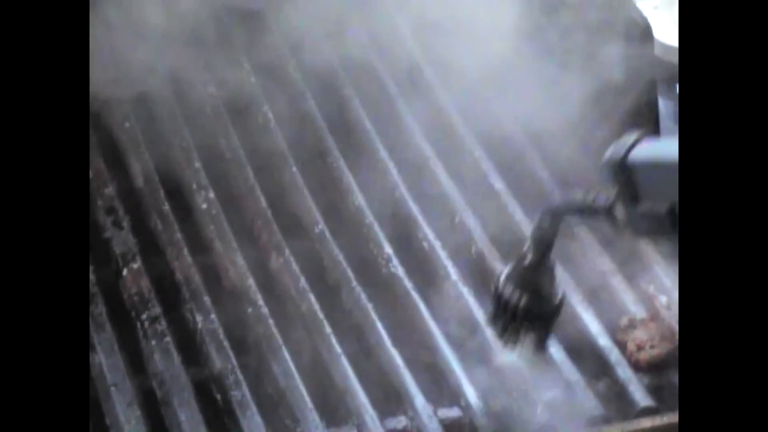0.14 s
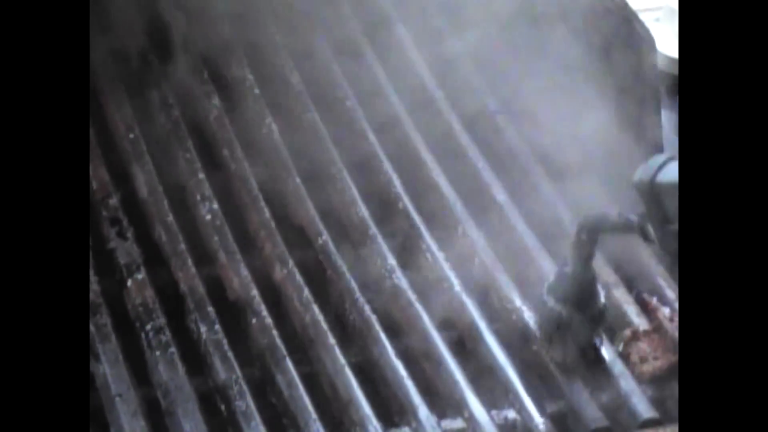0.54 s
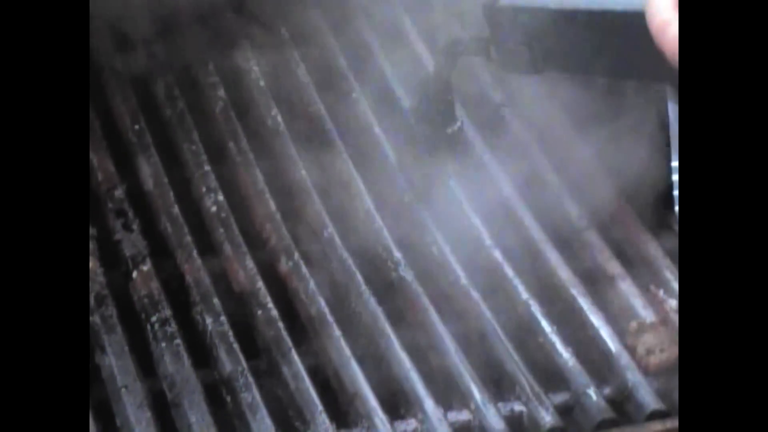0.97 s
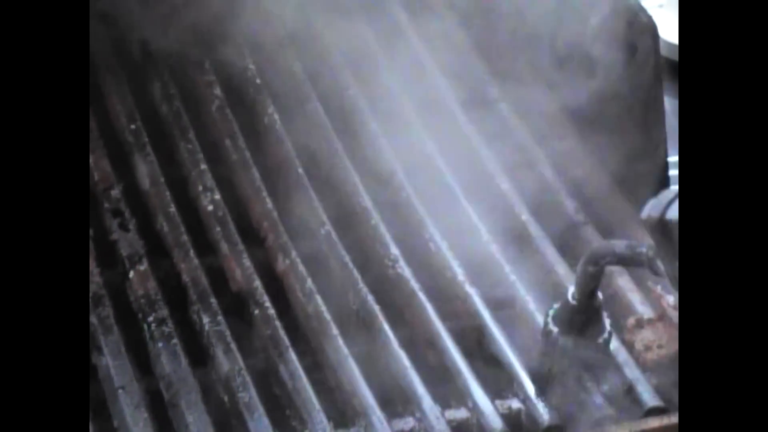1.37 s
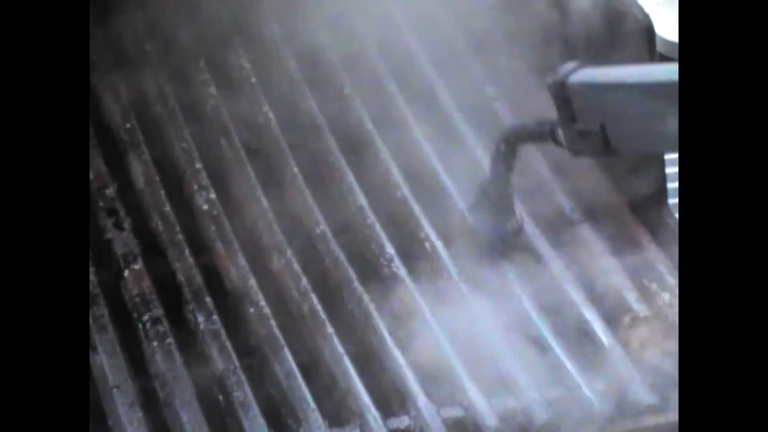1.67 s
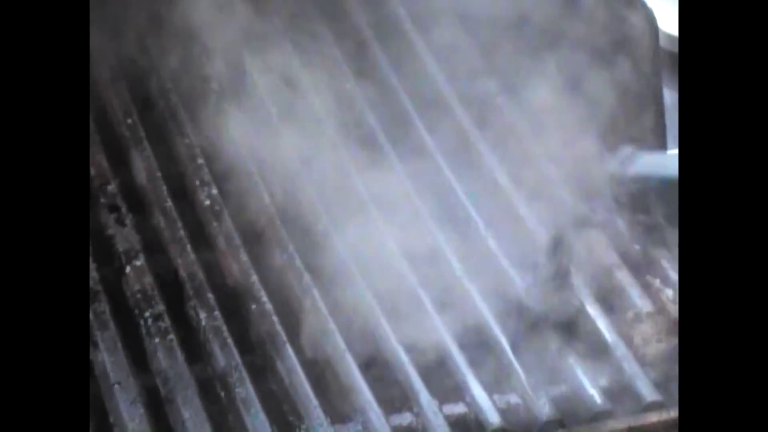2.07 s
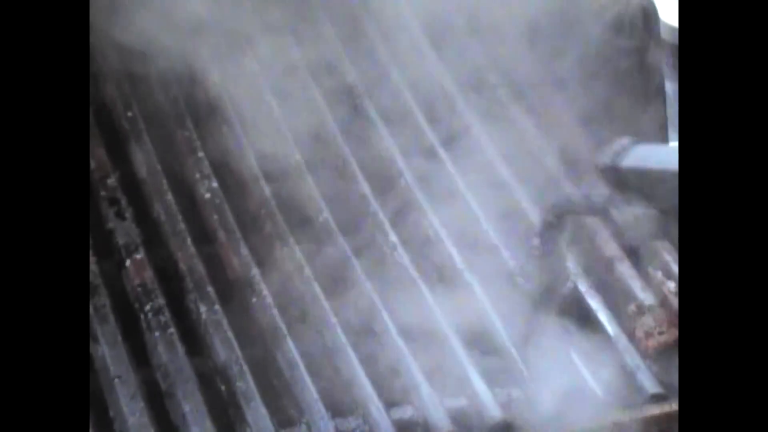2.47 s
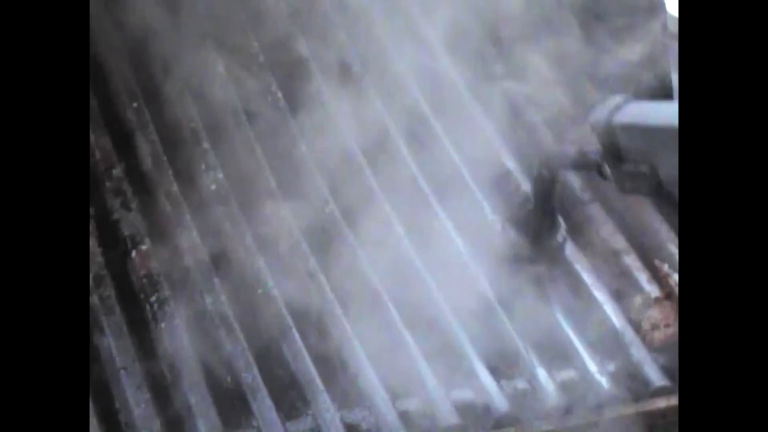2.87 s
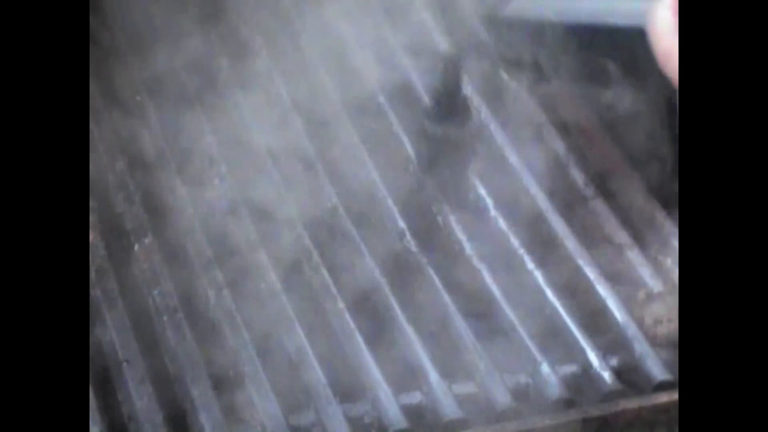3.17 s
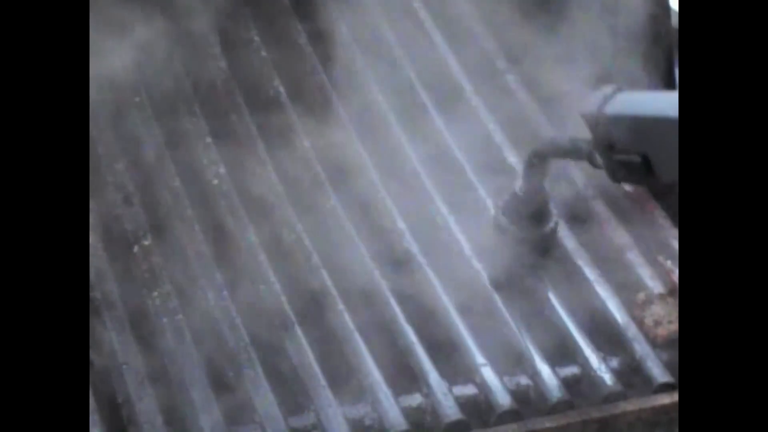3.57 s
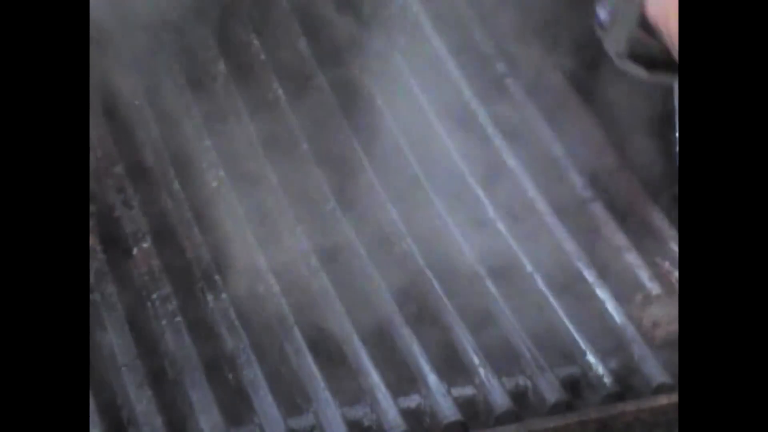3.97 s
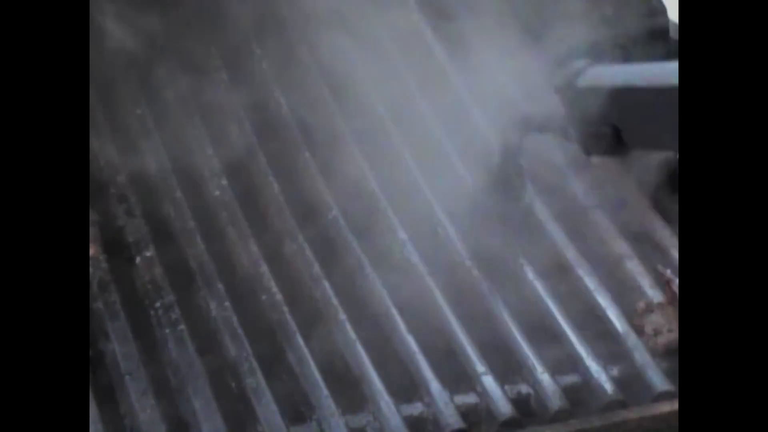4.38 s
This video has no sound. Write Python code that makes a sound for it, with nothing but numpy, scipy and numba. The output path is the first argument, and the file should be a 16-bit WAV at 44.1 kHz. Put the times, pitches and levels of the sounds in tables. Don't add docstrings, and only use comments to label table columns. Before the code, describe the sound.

A hand-held steam nozzle sweeps over metal grill bars about half a metre from a small camera microphone. The strong, bright hiss never stops; it shifts colour with each pass, fizzing briefly as it crosses bars. Wetter splashes and tiny spits sit inside it, while dull puffs drum in the metal box below. Faint outdoor rumble lies underneath, with no speech.

```python
import sys
import numpy as np
from scipy import signal
from scipy.io import wavfile
from scipy.ndimage import uniform_filter1d, map_coordinates
from numba import njit

SR = 44100
rng = np.random.default_rng(int(sys.argv[2]) if len(sys.argv) > 2 else 0)


def output_pcm(signal):
    pcm = np.clip(np.atleast_2d(signal).T, -1, 1) * 32767
    wavfile.write(sys.argv[1], SR, np.round(pcm).astype(np.int16))


def amplitude_ratio(level_db):
    exponent = np.asarray(level_db, float) / 20
    return 10 ** exponent


N = 199590

# (time [s], jet level [dB], turn towards the ports [dB], sizzle centre [Hz])
NOZZLE_AIM = [(0.0, -47.5, -1.5, 8200), (0.22, -49.5, 0, 7800), (0.32, -48, -0.5, 7660),
              (0.57, -46, 0.5, 9200), (0.72, -47, 2, 9500), (0.9, -49, -3, 7800), (1.2, -47, 0, 7600),
              (1.3, -47, -0.5, 9500), (1.5, -48, -0.5, 7400), (1.85, -47, -1, 8460), (2.13, -47, 0, 7400),
              (2.5, -46.5, -0.5, 7700), (2.85, -47.5, -0.5, 9200), (3.2, -47, -0.5, 7840),
              (3.6, -47.5, 1, 8060), (4.14, -49.5, -2, 7450), (4.3, -49.5, -2.5, 7100),
              (4.53, -48, 1, 9400)]
# (frequency [Hz], level [dB per Hz])
STEAM_COLOUR = [(71, -48), (120, -20.5), (245, -8), (340, -20.5), (417, -11.5), (522, -6), (835, -5.5),
                (944, -7), (2360, 0), (2730, -2.5), (6300, 2), (11200, -2.5), (15800, -16.5)]
FAR_HZ = 2450
LEFT_RIGHT = np.array([[1.], [-1.]])


def level(x, db):
    return x * amplitude_ratio(db) / np.sqrt(np.mean(x ** 2))


def at_hz(table, hz):
    f, value = np.transpose(table)
    return np.interp(np.log(hz), np.log(f), value)


def curves(table):
    s, *columns = np.transpose(table)
    return [np.interp(np.arange(N) / SR, s, column) for column in columns]


def walk(rate):
    hold = max(int(SR / rate), 2)
    steps = np.repeat(rng.standard_normal(N // hold + 1), hold)
    return 1.364 * uniform_filter1d(uniform_filter1d(steps, hold), hold)[:N]


def bumps(s, length, tail=1):
    late = np.arange(N) / SR - s
    return np.exp(-(2.3 * late / np.where(late > 0, tail * length, length)) ** 2)


@njit
def svf(x, g, q):
    y, b, l = np.empty(len(x)), 0., 0.
    for i in range(len(x)):
        v = (b + g[i] * (x[i] - l)) / (1 + g[i] * (g[i] + 1 / q))
        b, l, y[i] = 2 * v - b, l + 2 * g[i] * v, v / q
    return y


def eddies(hz, q, drops):
    # (frequency [Hz], side minus mid [dB])
    spread = [(30, -2), (70, -8), (150, -21), (500, -19), (800, -17), (1200, -29), (2000, -19.5),
              (3000, -16.5), (4400, -16.5), (8000, -12.5), (10500, -10), (12500, -10), (15500, -13)]
    # (frequency [Hz], left minus right [dB])
    balance = [(60, 1.0), (110, 1.0), (200, 1.0), (380, 0.5), (700, 0.0), (1290, 0.0), (2380, 0.0),
               (4400, -2.5), (8120, -2.5), (15000, 0.0)]
    g = np.tan(np.pi * np.minimum(hz, .45 * SR) / SR) * np.ones(N)
    noises = drops * rng.standard_normal((2, N))
    mid, side = (level(svf(svf(noise, g, q), g, q), 0) for noise in noises)
    mean_hz = np.mean(hz)
    stereo = mid + amplitude_ratio(at_hz(spread, mean_hz)) * side * LEFT_RIGHT
    return stereo * amplitude_ratio(at_hz(balance, mean_hz) / 2 * LEFT_RIGHT)


def turbulence(lo_hz, hi_hz, colour, gust_db, patchy_db, patchy_rate, grit_db, count):
    out, drops = 0, amplitude_ratio(grit_db * walk(500))
    for hz in np.geomspace(lo_hz, hi_hz, count):
        band_db = at_hz(colour, hz) + 10 * np.log10(hz)
        out = out + amplitude_ratio(band_db + patchy_db * walk(patchy_rate)) * eddies(hz, 2.53, drops)
    return level(out * amplitude_ratio(gust_db * walk(31.96)), 0)


def jet():
    jet_db, turn_db, hump_hz = curves(NOZZLE_AIM)
    core = turbulence(3780, 7150, STEAM_COLOUR, gust_db=0.9, patchy_db=.9, patchy_rate=12, grit_db=1.1, count=6)
    sizzle = turbulence(7820, 10070, STEAM_COLOUR, gust_db=0.6, patchy_db=1.1, patchy_rate=11, grit_db=2., count=3)
    hump = eddies(uniform_filter1d(hump_hz, SR // 12), 2.6, amplitude_ratio(0.92 * walk(430)))
    bright = level(sizzle + amplitude_ratio(-4.5) * hump, 0)
    return (core * amplitude_ratio(-turn_db) + bright * amplitude_ratio(turn_db)) * amplitude_ratio(jet_db + chokes())


def chokes():
    # (time [s], length [s], step [dB])
    steps = [(0.05, .05, 1.5), (0.132, 0.022, 3), (0.195, 0.037, -1.5), (0.297, 0.044, 2),
             (0.514, 0.014, -0.5), (0.67, 0.021, -1.5), (0.78, 0.048, 0), (1.07, 0.017, 2.5),
             (1.164, 0.02, -2), (1.567, 0.025, -2), (1.862, 0.021, 0), (2.12, .03, 1), (2.59, 0.064, -3),
             (2.857, 0.032, 2), (2.927, 0.059, -3.5), (3.17, 0.046, -1.5), (3.66, 0.043, -3),
             (3.68, 0.025, 3), (3.852, 0.043, 2), (3.868, .014, 2), (3.885, 0.025, -2), (3.943, 0.016, -2),
             (4.035, 0.043, 3), (4.118, 0.024, 2), (4.178, 0.027, -1.5), (4.237, 0.052, -3),
             (4.262, 0.03, 2.5), (4.334, .04, 0.5), (4.365, 0.034, -1), (4.39, .03, 1.5),
             (4.473, 0.027, -1), (4.494, 0.033, 2)]
    return sum(db * bumps(s, length) for s, length, db in steps)


def bars():
    jet_db, turn_db, _ = curves(NOZZLE_AIM)
    mist = turbulence(10900, 15700, STEAM_COLOUR, gust_db=.6, patchy_db=1.4, patchy_rate=20, grit_db=.8, count=4)
    return mist * amplitude_ratio(-53 + (jet_db - jet_db.mean()) - 0.52 * turn_db + flares())


def flares():
    # (time [s], rise [dB], length [s])
    crossings = [(0.067, 7, 0.039), (0.24, 3, 0.029), (0.43, -4, 0.035), (0.766, 8, 0.026),
                 (1.142, 10.5, 0.04), (1.286, 7, 0.053), (1.448, 6.5, 0.073), (1.63, 3, 0.033),
                 (1.877, 7, 0.12), (1.98, 7.5, 0.036), (2.184, 2.5, 0.044), (2.362, 3.8, 0.055),
                 (2.526, 6.5, 0.093), (2.817, 5, 0.035), (2.899, 10.5, 0.06), (3.018, 8, 0.038),
                 (3.138, 6.5, 0.022), (3.323, 4, 0.078), (3.433, 8, 0.021), (3.624, 8.5, 0.056),
                 (3.775, 5, 0.054), (3.913, 3, 0.043), (3.995, 4, 0.063), (4.202, 9.5, 0.055),
                 (4.333, 8, 0.056), (4.442, 7.5, 0.065)]
    return sum(db * bumps(s, length) for s, db, length in crossings)


def splash():
    # (time [s], length [s], rise [dB], thin over thick [dB])
    strikes = [(0.0, 0.14, -2.5, 5.5), (0.13, 0.028, 1, -4.5), (0.34, 0.39, 6.5, -7), (0.487, 0.039, 9, -1),
               (0.526, 0.016, 7.5, -1), (0.606, 0.18, 9.5, -6.5), (0.98, 0.17, 2.5, -1.5),
               (1.227, 0.22, 4.5, -3.5), (1.753, 1, 2, 0), (2.093, 0.1, 0, 3), (2.248, 0.033, -0.5, 6),
               (2.43, 0.18, 0, 4.5), (2.703, 0.16, 4, -1.5), (2.864, 0.061, 3.5, 1.5),
               (2.96, 0.15, 4.5, -0.5), (3.547, 0.11, 6, -3.5), (3.817, 0.42, 2, -0.5),
               (4.032, 0.23, 2, -4.5), (4.26, 0.069, 6.5, -11), (3.297, 0.53, 2, -1.5), (1.5, 0.42, -2, 2),
               (4.393, 0.033, 4.5, -1.5), (4.483, 0.045, 5, -6)]
    # (time [s], level [dB], length [s], centre [Hz])
    water_spits = [(.472, -54, .008, 1300), (.496, -51, .01, 4200), (.527, -52, .007, 1900),
                   (.692, -46, .02, 9000), (.948, -51, .012, 5500), (1.074, -47, .017, 5000),
                   (3.131, -51, .012, 6000), (3.52, -49, .008, 4400), (3.577, -46.5, .02, 8200),
                   (3.972, -50, .01, 5600), (4.046, -46, .004, 4500), (4.136, -50, .012, 4500),
                   (4.266, -52, .018, 2400)]
    shadow_share, shadow_lag_s = 0.36, 0.0047
    dips_db = 1.32 * chokes() - shadow_share * np.roll(flares(), int(shadow_lag_s * SR))
    thick_db = -60.5 + dips_db + sum(db * bumps(s, length) for s, length, db, _ in strikes)
    thin_db = -54 + dips_db + sum((db + tilt_db) * bumps(s, length) for s, length, db, tilt_db in strikes)
    thick = turbulence(1060, 1900, STEAM_COLOUR, gust_db=.6, patchy_db=1., patchy_rate=12, grit_db=1.5, count=5)
    thin = turbulence(2080, 3350, STEAM_COLOUR, gust_db=.5, patchy_db=1., patchy_rate=12, grit_db=1.5, count=4)
    spits = sum(amplitude_ratio(db) * burst(s, length, hz, 1.6) for s, db, length, hz in water_spits)
    return thick * amplitude_ratio(thick_db) + thin * amplitude_ratio(thin_db) + spits


def burst(s, length, hz, q):
    out, t = np.zeros(N), np.arange(-int(1.3 * length * SR), int(0.74 * length * SR))
    swell = np.exp(-(2.0 * t / SR / length) ** 2)
    band = svf(rng.standard_normal(len(t)), np.full(len(t), np.tan(np.pi * hz / SR)), q)
    out[np.clip(int(s * SR) + t, 0, N - 1)] = level(band, 0) * swell
    return out


def droplets(count, lo_hz, hi_hz, ring_s, spread_db, db):
    when, pitch, size = rng.random((count, 3)).T
    t = np.arange(800) / SR
    hz = lo_hz + (hi_hz - lo_hz) * pitch[:, None]
    fleck = np.sin(2 * np.pi * hz * t) * (t / ring_s) * np.exp(-t / ring_s)
    out = np.zeros(N + len(t))
    places = (when * N).astype(int)[:, None] + np.arange(len(t))
    np.add.at(out, places, fleck * amplitude_ratio(spread_db * size)[:, None])
    return level(out[:N], db)


def ridges(reach):
    combs = [
        (1.0, 6.2, 0.92),
    ]
    # (time [s], length [s], level [dB])
    glints = [
        [(.3, 0.72, -58), (1.1, 1, -64.5), (1.75, 1, -59.5), (2.3, 0.56, -59), (2.85, 0.98, -60),
         (3.5, 0.86, -62), (4.4, 0.48, -57.5)],
    ]
    out = 0
    for (multiple, q, slide), rows in zip(combs, glints):
        swell = sum(amplitude_ratio(db) * bumps(s, length) for s, length, db in rows)
        band = eddies(multiple * FAR_HZ * reach ** slide, q, 1.)
        out = out + swell * amplitude_ratio(1.8 * walk(24)) * band
    return out


def delayed(x, lag_s):
    now = np.arange(N)
    return np.array([map_coordinates(c, [now - lag_s * SR], order=3, mode="mirror") for c in x])


def walls(hiss, reach):
    echoes = [(1.3, .06), (1.9, .08), (2.6, .08), (3.2, .1), (3.9, .14), (4.6, .12), (5.5, .17), (6.3, .13),
              (7.2, .14), (8.3, .13), (9.5, .13), (11, .12), (12.8, .11), (15, .1), (18, .1), (22, .09)]
    band = signal.butter(1, (1800, 10000), "band", fs=SR, output="sos")
    dull = signal.sosfilt(band, hiss.mean(axis=0, keepdims=True))
    out = 0
    for periods, share in echoes:
        fade = share * (1 + 1.3 * walk(16))
        pan = amplitude_ratio(2. * walk(2.97) * LEFT_RIGHT)
        lag_s = periods / FAR_HZ / reach ** 1.1 * (1 + .02 * walk(3))
        out = out + fade * pan * delayed(dull, lag_s)
    return amplitude_ratio(-2.) * out


def interfere(sound, rows, q, depth):
    out = sound.copy()
    flicker, waver = walk(45), walk(45)
    for k, (s, length, hz, slide, db) in enumerate(rows):
        i = np.arange(max(int((s - length) * SR), 0), min(int((s + length) * SR), N))
        late = i / SR - s
        own = (i + k * SR // 3) % N
        g = np.tan(np.pi * (hz + slide * late) * (1 + .008 * waver[own]) / SR)
        lift = amplitude_ratio(depth * db * (1 + .6 * np.tanh(flicker[own]))) - 1
        fade = np.exp(-(2.63 * late / length) ** 4)
        out[:, i] += lift * fade * np.array([svf(c[i], g, q) for c in sound])
    return out


def firebox():
    # (frequency [Hz], width [Hz], level [dB])
    air_modes = [(248.3, 27, 2), (299.8, 15.7, 3.5), (390.7, 22.5, -0.5), (434.2, 17.3, 3), (579, 10.3, 3),
                 (640, 10.5, -7), (816, 32, 1), (868, 34, 4), (1137, 16, -7), (1259, 48, 1), (1846, 32, -5)]
    boom_db, roar_db = gusts()
    boom = turbulence(171, 438, STEAM_COLOUR, gust_db=1., patchy_db=1., patchy_rate=12, grit_db=2.5, count=6)
    roar = turbulence(520, 958, STEAM_COLOUR, gust_db=1.2, patchy_db=1., patchy_rate=12, grit_db=0.9, count=5)
    deep, high = 0, 0
    for hz, width_hz, db in air_modes:
        ring = amplitude_ratio(db + 1.3 * walk(12)) * np.sqrt(width_hz) * eddies(hz, 0.72 * hz / width_hz, 1.)
        if hz < 500:
            deep = deep + ring
        else:
            high = high + ring
    low_part = level(boom + level(deep, 1.0), 0) * amplitude_ratio(-71.5 + boom_db)
    high_part = level(roar + level(high, -3.3), 0) * amplitude_ratio(-67.5 + roar_db)
    return low_part + high_part


def gusts():
    # (peak time [s], length [s], rise [dB], roar over boom [dB])
    puffs = [(0.0, 0.072, 11.5, -8), (0.237, 0.056, 2.5, 5), (0.363, 0.22, 4, 2.5), (0.525, 0.051, 14, 1),
             (0.603, 0.066, 8, -1.5), (0.896, 0.15, 14.5, -6), (1.006, 0.083, 9.5, 1),
             (1.228, 0.21, 7.5, -3.5), (1.627, 0.14, 10.5, -3), (1.708, 0.16, 14, -10),
             (2.005, 0.083, 6.5, -2), (2.257, 0.082, 14, -8), (2.4, 0.055, 7, -1.5),
             (2.628, 0.062, 10, -5.5), (2.71, 0.12, 9.5, -3), (2.96, .06, 5, -2), (3.204, 0.23, 10.5, -2),
             (3.507, 0.15, 8.5, -3), (3.82, 0.18, 10.5, -1), (4.006, 0.091, 10.5, -2.5),
             (4.26, 0.11, 3, 3.5), (4.424, 0.2, 5, -1.5)]
    boom_db, roar_db = [], []
    for s, length, db, tilt_db in puffs:
        swell = bumps(s, length, tail=2.56)
        boom_db.append(max(db, 0) * swell)
        roar_db.append(max(db + tilt_db, 0) * swell)
    return np.max(boom_db, axis=0), np.max(roar_db, axis=0)


def lid_echo(direct):
    lag_s, share = 0.004692, 0.18
    low = signal.sosfilt(signal.butter(2, 1600, fs=SR, output="sos"), direct)
    return share * np.roll(low, int(lag_s * SR), axis=1)


def yard():
    # (frequency [Hz], level [dB per Hz])
    rumble_colour = [(13, -48), (22, -9.5), (75, -6), (119, -0.5), (150, 5), (170, 4), (220, -30),
                     (370, -120)]
    # (time [s], length [s], rise [dB])
    shoves = [
        (0.605, 0.24, 4),
        (1.8, 0.26, 2.5),
        (2.805, 0.36, 6),
    ]
    rumble = turbulence(23.3, 157.6, rumble_colour, gust_db=.8, patchy_db=.8, patchy_rate=2.89, grit_db=0.3, count=7)
    boom_db, _ = gusts()
    push_db = uniform_filter1d(boom_db, int(0.27 * SR))
    shove_db = sum(db * bumps(s, length) for s, length, db in shoves)
    return rumble * amplitude_ratio(-81.5 + 0.59 * push_db + shove_db)


def scene():
    # (time [s], ridge [Hz])
    sweep = [(0, 2292), (.3, 2156), (.55, 2242), (.78, 2166), (1.03, 2483), (1.35, 2294), (1.5, 2275),
             (1.8, 2454), (2.1, 2252), (2.35, 2374), (2.55, 2260), (2.8, 2388), (3.05, 2407), (3.4, 2460),
             (3.65, 2306), (4.12, 2512), (4.3, 2330), (4.53, 2430)]
    # (time [s], length [s], centre [Hz], slide [Hz per s], lift [dB])
    crests = [(0.104, 0.3, 7740, 2, 10), (.24, 0.065, 10300, 0, 12.5), (0.302, .14, 6450, 1003, 8),
              (0.302, 0.061, 7800, 2, 10), (0.41, .08, 10450, 0, 14), (0.542, 0.11, 9600, 1510, 8),
              (0.858, 0.16, 3250, 2500, 5), (.7, 0.11, 9800, 1510, 8.5), (0.91, 0.21, 6360, 4000, 10),
              (0.968, 0.28, 4230, 1998, 9), (0.964, .08, 4930, 0, 11), (1.06, .07, 4420, -2, 6),
              (1.175, .2, 4280, -1200, 10), (1.133, 0.067, 6600, 0, 10), (1.282, 0.055, 3220, -1500, 12.5),
              (1.4, 0.068, 5200, -1, 8), (1.45, .16, 4600, 2, 1), (1.45, 0.41, 7540, 1509, 7),
              (1.737, 0.092, 4700, 0, 8.5), (1.778, 0.22, 3140, 2502, 9.5), (1.777, 0.2, 9300, 5002, 9),
              (1.858, 0.063, 4740, 0, 11), (2.1, .12, 3200, 3, 1.5), (2.125, .1, 7900, 0, 9.5),
              (2.403, 0.12, 4570, -2, 12), (2.41, 0.096, 7850, -12, 12), (2.534, 0.27, 4970, 0, 4.5),
              (2.75, .12, 3900, 994, 8), (2.8, 0.2, 6400, -800, 5), (2.878, 0.11, 3300, -12, 11),
              (3.13, 0.06, 6050, 0, 12), (3.226, 0.28, 4000, 1989, 3), (3.34, 0.42, 6560, 300, 8.5),
              (3.403, 0.11, 4850, 3, 8), (3.49, 0.24, 4200, -2500, 17), (3.61, 0.33, 6150, -1800, 9),
              (3.973, 0.044, 4600, 3, 15), (4.042, 0.079, 4000, -4, 7), (4.145, 0.086, 4440, 0, 12),
              (4.203, .4, 7200, 0, 8.5)]
    # (time [s], length [s], centre [Hz], slide [Hz per s], lift
    # [dB])
    more_crests = [(.48, .07, 1130, 0, 14), (0.625, 0.11, 3100, 4, 15), (0.978, 0.15, 2370, 1500, 9),
                   (1.0, 0.22, 6500, 600, 3), (1.05, 0.17, 3500, 500, 1), (1.2, .16, 2330, -1500, 5),
                   (1.5, 0.13, 5570, 0, 3.5), (1.6, 0.17, 4800, 1500, 11), (1.64, 0.17, 8300, 5000, 8),
                   (2.05, 0.11, 4970, 0, 4), (2.547, 0.22, 7900, 2, 3), (2.66, 0.23, 3020, 3000, 7.5),
                   (2.72, .2, 2410, 1200, 4), (4.093, 0.18, 4260, 5000, 3), (3.04, 0.22, 4630, -2, 5),
                   (3.48, .2, 2400, -1200, 6), (3.903, 0.22, 6500, 800, 6)]
    # (time [s], length [s], centre [Hz], slide [Hz per s], lift [dB])
    hollows = [(0.113, .12, 2750, -5, -10), (.35, 0.28, 3820, -500, -9), (0.368, 0.13, 11100, 9, -9),
               (0.495, 0.95, 13100, 0, -9), (.6, 0.22, 6600, -1500, -7), (0.742, 0.11, 5600, 0, -17),
               (0.778, .12, 4100, 0, -6), (.95, 0.17, 8750, -1000, 2), (.95, .3, 11800, 3, -3),
               (1.56, .16, 10300, 10, -11), (1.73, 0.16, 11500, 3, -9), (2.557, .12, 2850, 0, -3),
               (2.577, 0.11, 4400, 3, -3), (3.273, 0.21, 10200, 0, -10), (3.473, 0.14, 8900, 0, -11),
               (4.1, 0.6, 3320, 5, -6), (4.098, 0.18, 2050, 0, -16), (4.22, 0.33, 8500, 3002, 1),
               (4.35, 0.19, 5660, 0, -4), (4.49, 0.12, 7100, 0, -5)]
    reach = uniform_filter1d(curves(sweep)[0], SR // 16) / FAR_HZ
    flecks = droplets(count=1300, lo_hz=2972, hi_hz=10450, ring_s=0.0018, spread_db=3, db=-59.5)
    hiss = jet() + splash() + flecks
    combed = amplitude_ratio(-1.3) * (hiss + walls(hiss, reach))
    pressure = amplitude_ratio(0.45 * walk(17))
    direct = (combed + ridges(reach) + bars() + firebox()) * pressure
    hollowed = interfere(direct, hollows, q=7., depth=.72)
    crested = interfere(hollowed, crests + more_crests, q=24., depth=.6)
    return crested + lid_echo(direct) + yard()


def roll_off(x):
    return signal.sosfilt(signal.butter(12, 15800, fs=SR, output="sos"), x)


def record(dry):
    cut = signal.sosfilt(signal.ellip(10, .2, 60, 15700, fs=SR, output="sos"), dry)
    return roll_off(cut)


dry = scene()
out = record(dry)
output_pcm(out)
```